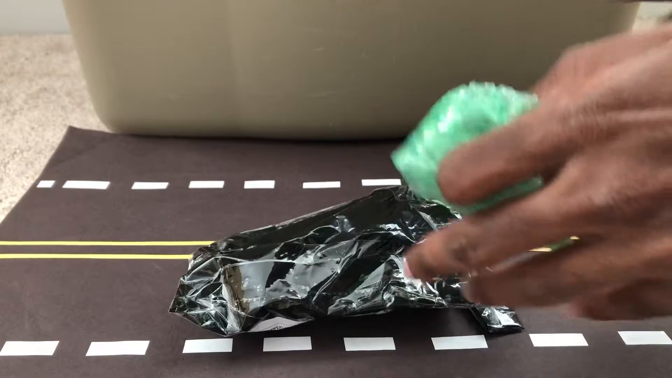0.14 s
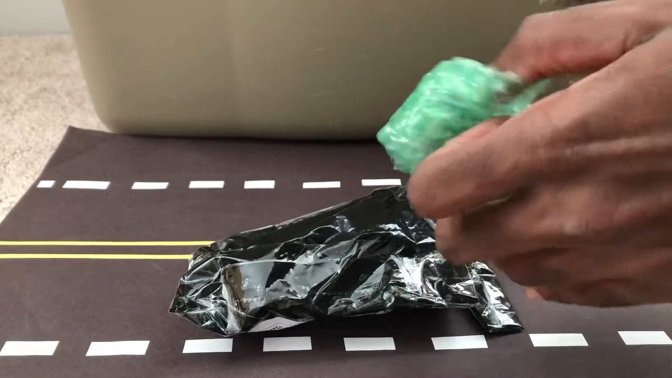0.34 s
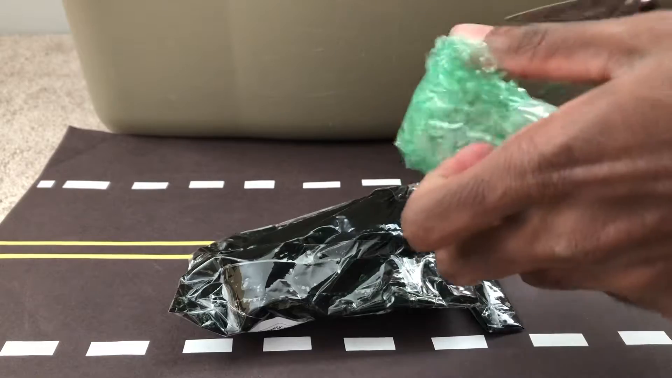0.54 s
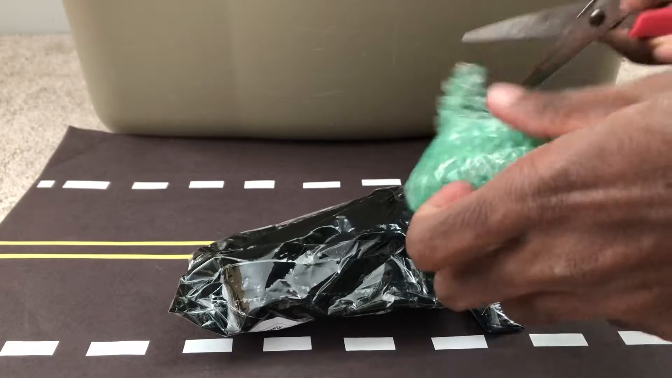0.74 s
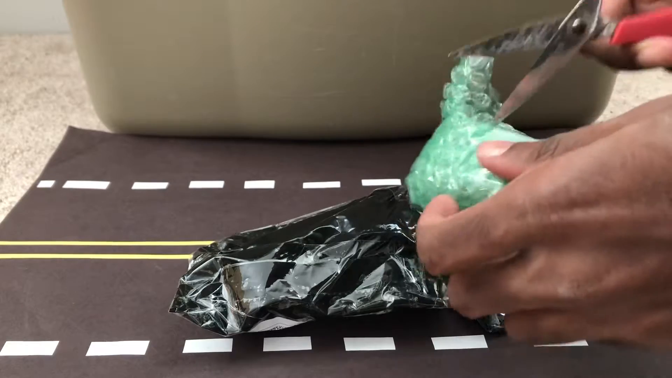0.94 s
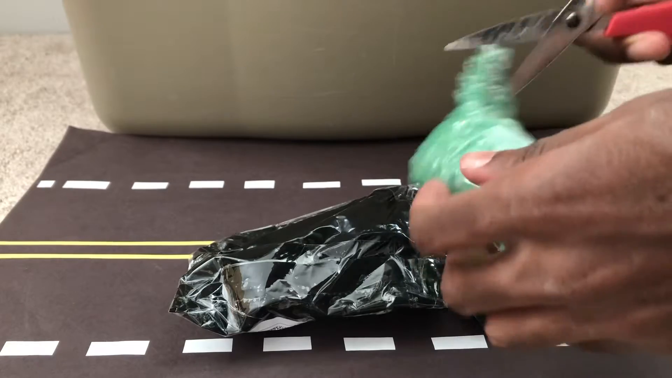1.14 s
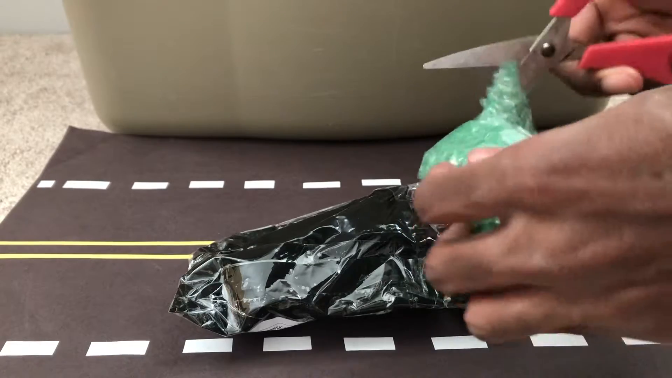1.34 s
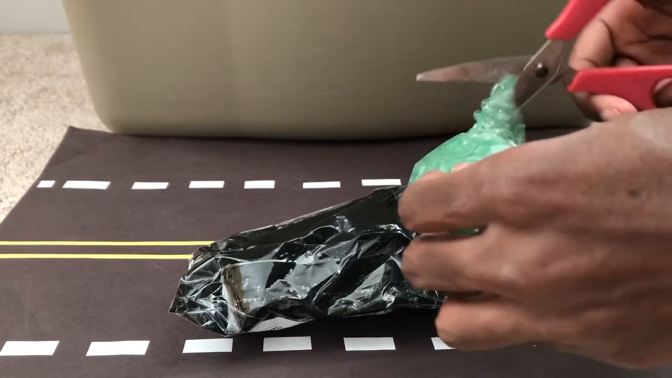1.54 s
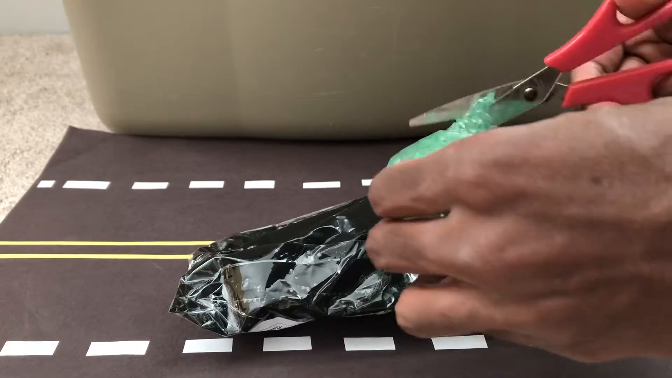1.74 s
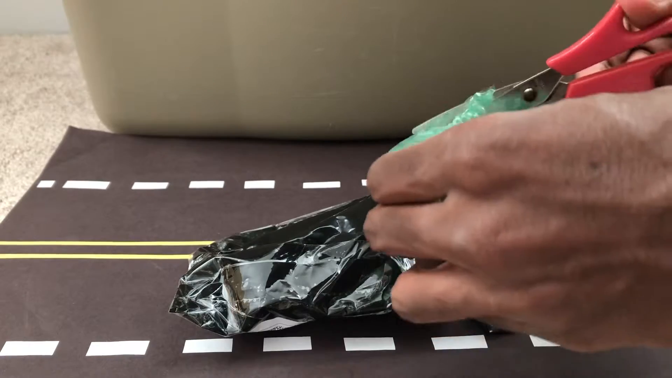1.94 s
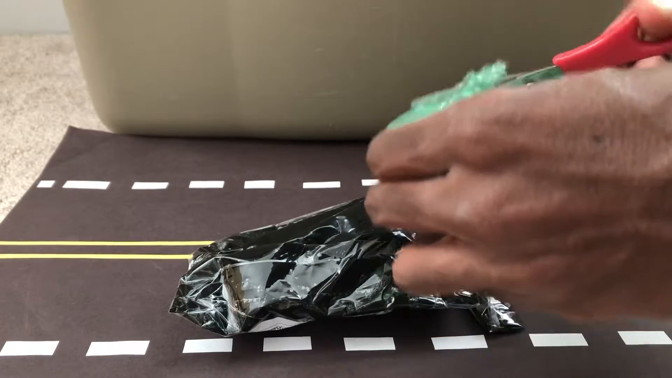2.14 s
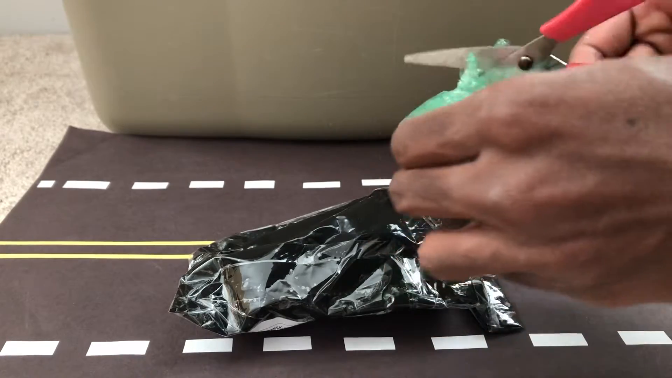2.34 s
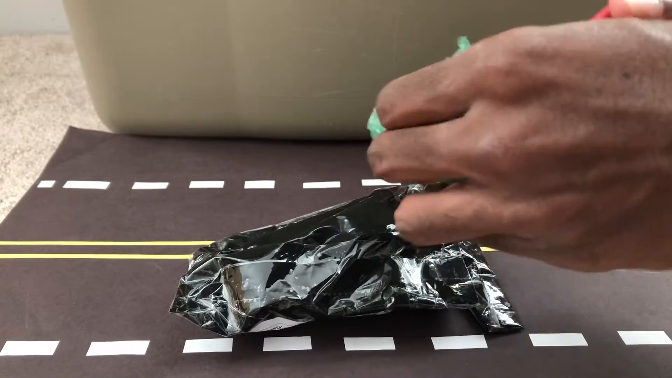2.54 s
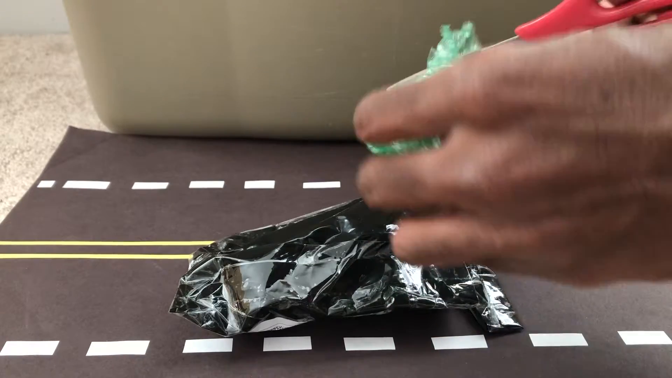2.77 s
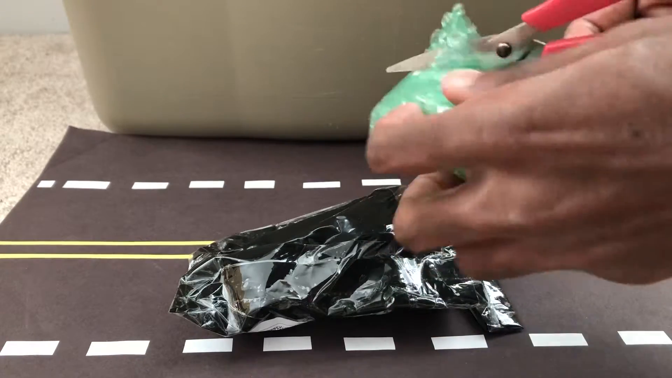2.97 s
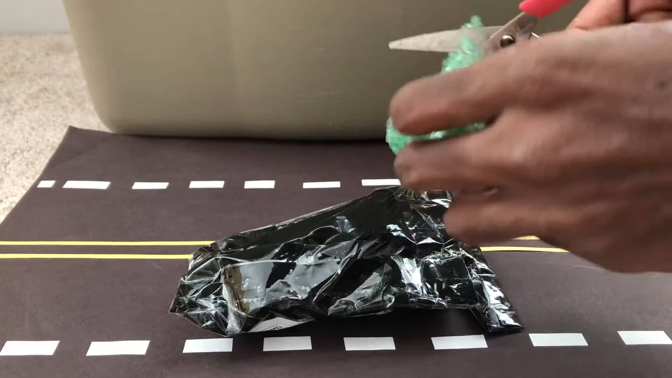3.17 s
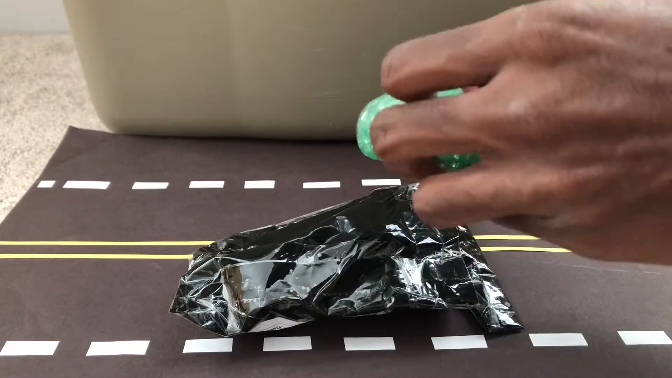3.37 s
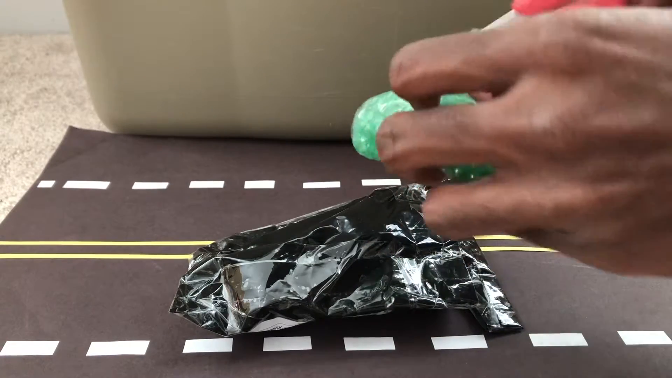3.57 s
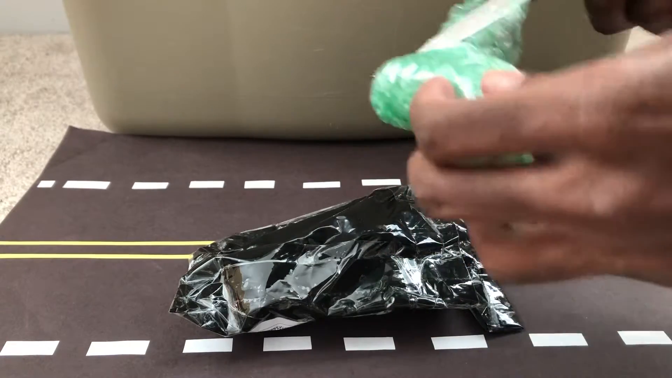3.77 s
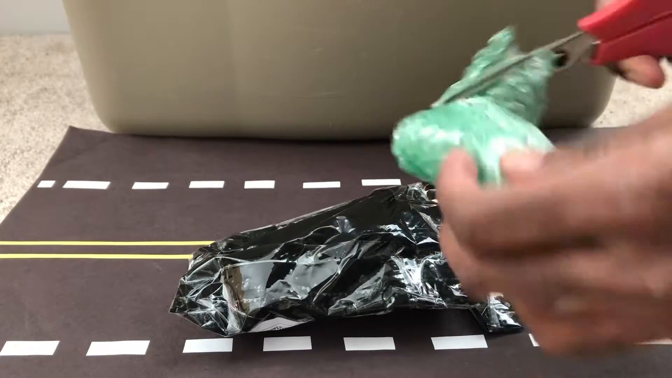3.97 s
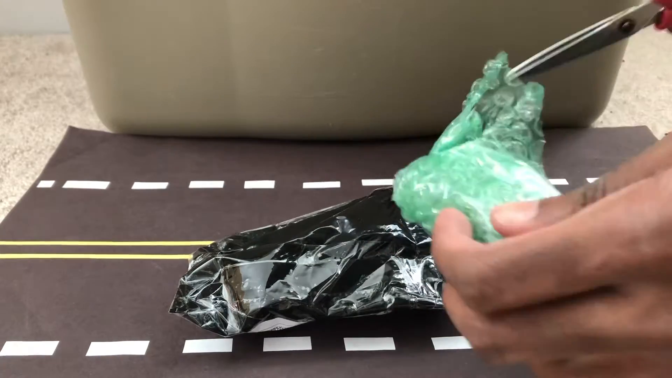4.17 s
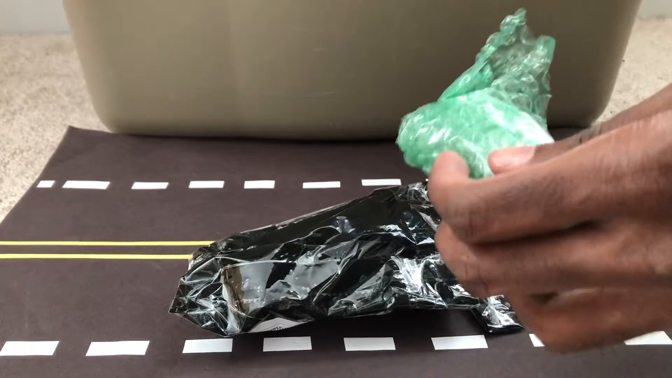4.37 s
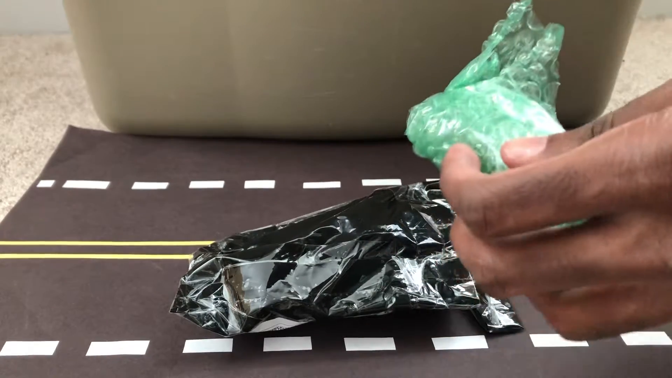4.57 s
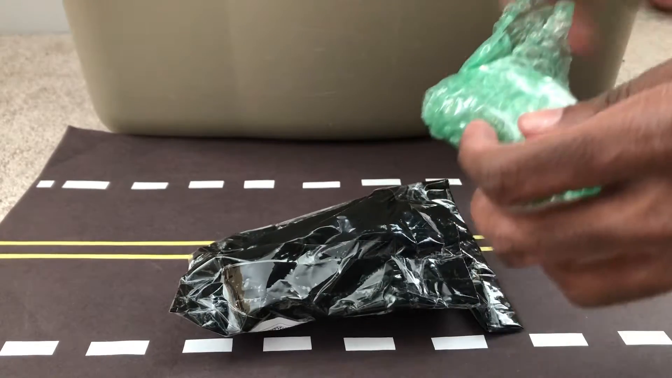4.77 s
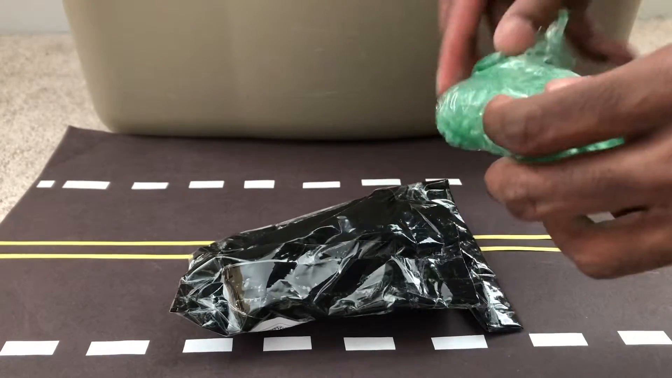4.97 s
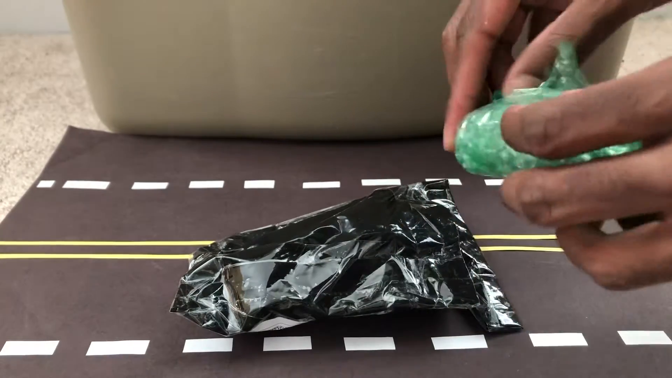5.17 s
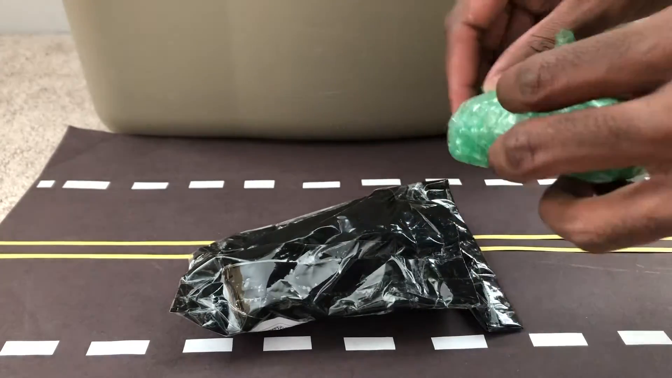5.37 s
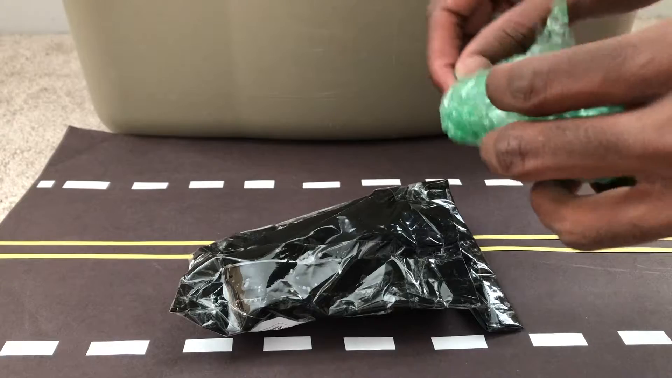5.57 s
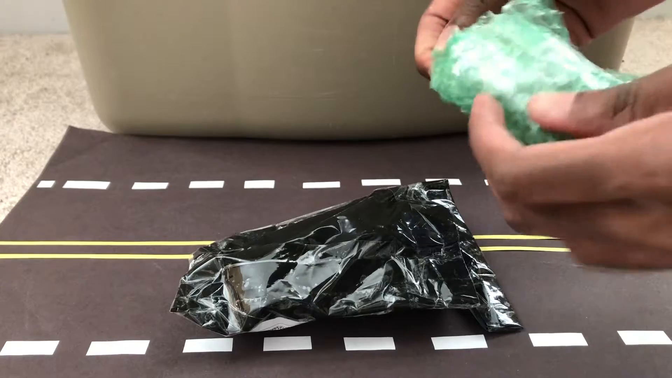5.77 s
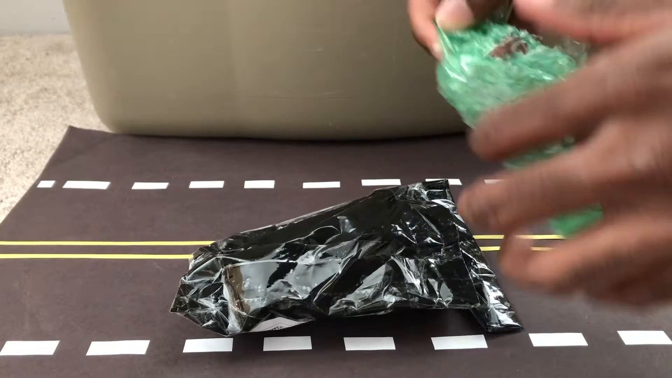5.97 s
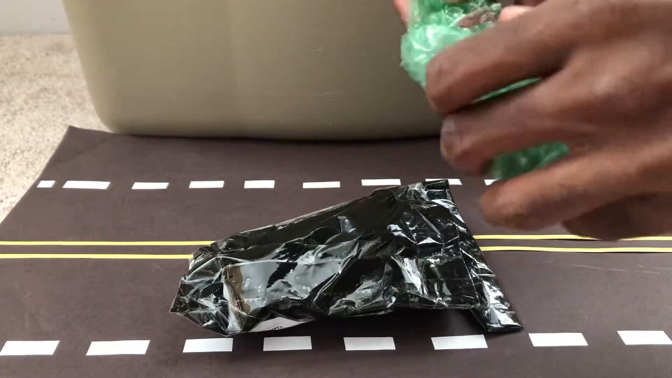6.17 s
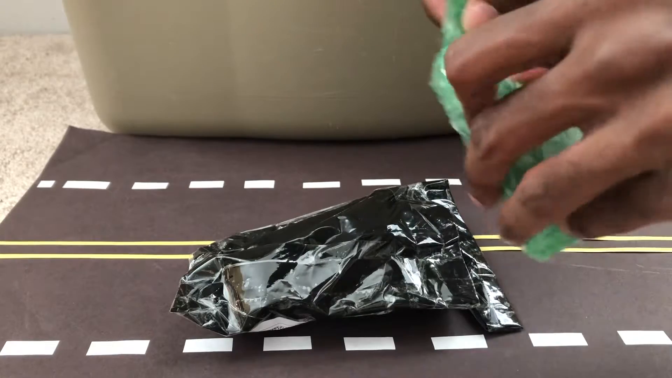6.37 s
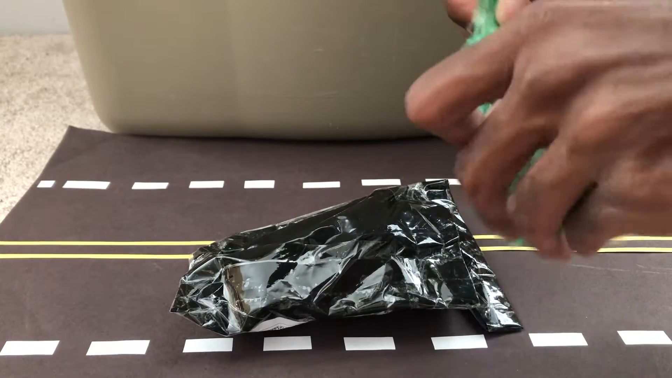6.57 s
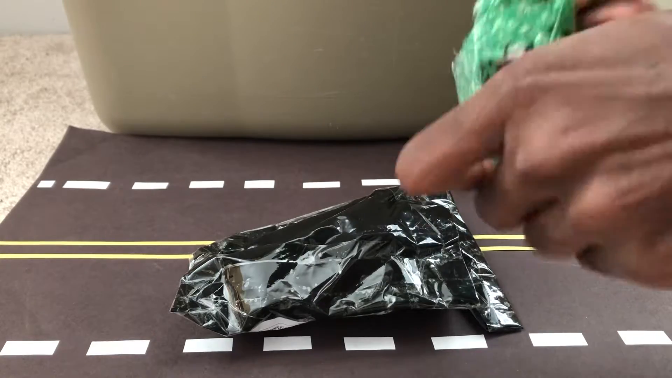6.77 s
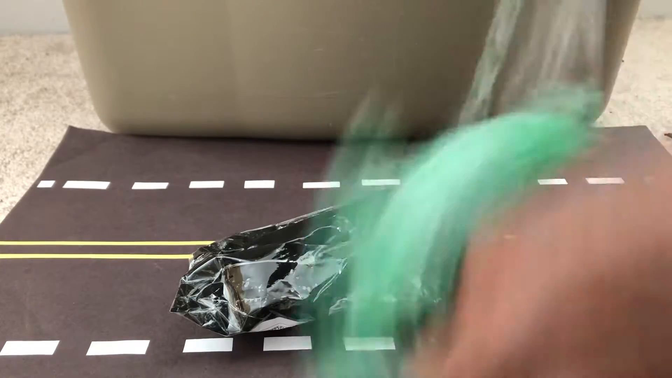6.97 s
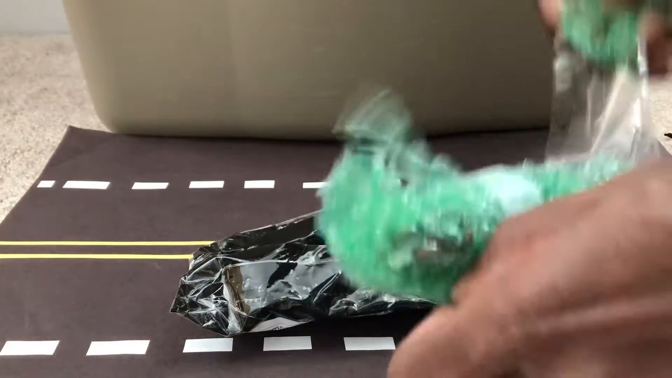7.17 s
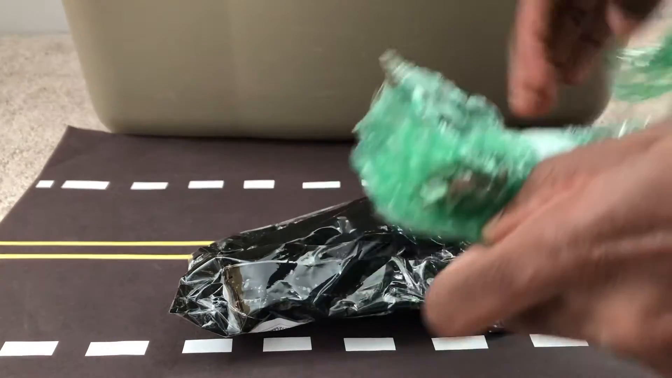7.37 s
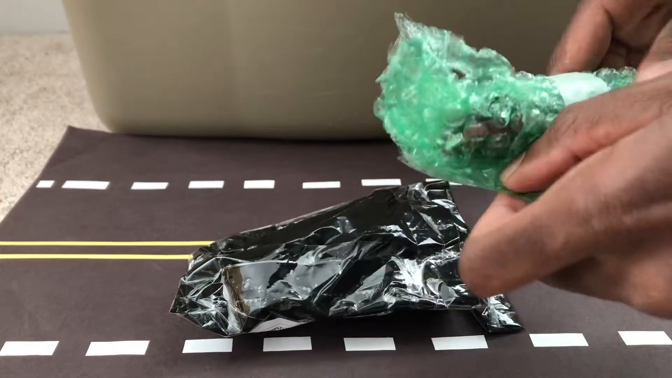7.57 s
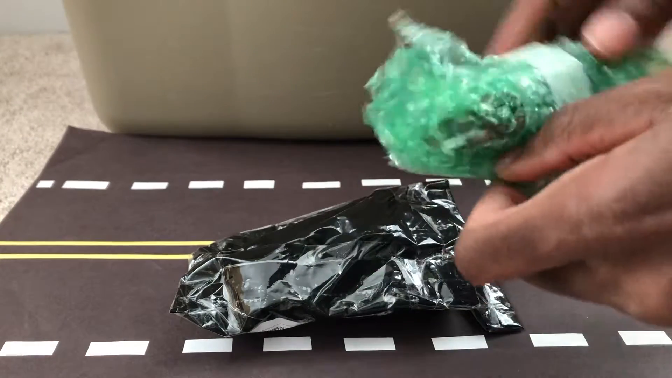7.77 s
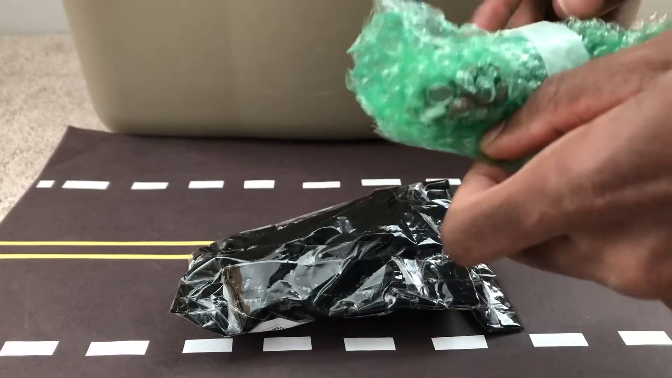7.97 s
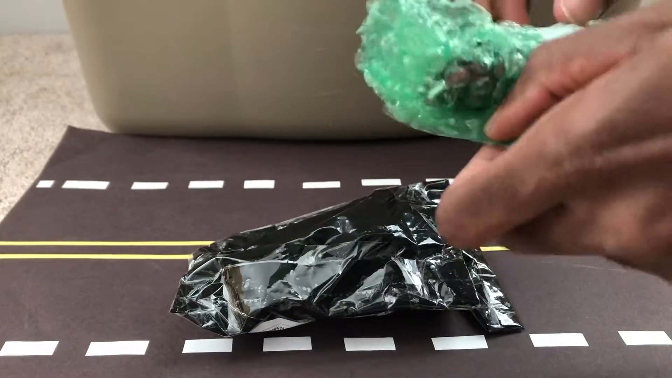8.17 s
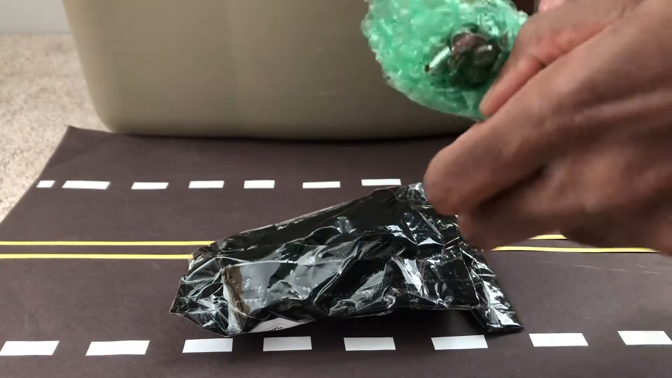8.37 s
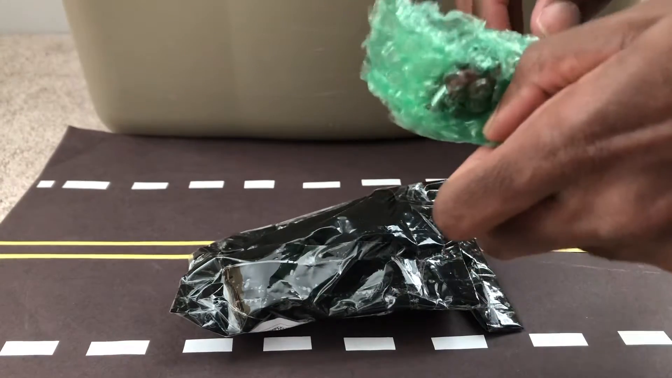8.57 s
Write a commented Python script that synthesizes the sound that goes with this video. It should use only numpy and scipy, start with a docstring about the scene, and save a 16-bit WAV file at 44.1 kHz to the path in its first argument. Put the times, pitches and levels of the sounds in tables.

```python
"""A quiet carpeted room, with hands and scissors working bubble wrap off a small object close by.
Film buckles in sharp snaps (clicks with dying noise) over fine crackle and rubbing, with a few hollow pops.
Near 2 s a taut strip squeals briefly, then the blades cut; after 4.6 s the scissors rattle, ring and thud down.
A second squeal follows; near 7 s tape rips loose among the loudest snaps and a third squeal, then it thins out.
Throughout, faint echoes of the work, band-filtered room noise and a wavering mains hum of sines lie behind."""
import sys
import numpy as np
from scipy import signal
from scipy.io import wavfile

SR = 44100
rng = np.random.default_rng(int(sys.argv[2]) if len(sys.argv) > 2 else 0)


def int16_out(signal):
    """Quantize to a 16-bit WAV file."""
    q = np.round(np.clip(np.atleast_2d(signal).T, -1, 1) * 32767)
    wavfile.write(sys.argv[1], SR, q.astype(np.int16))


N = 380141


def from_db(db):
    """Decibels to amplitude gain."""
    return 10 ** (np.asarray(db) / 20)


def rms_one(x):
    """Scales a signal to rms 1."""
    return x / np.sqrt(np.mean(x ** 2) + 1e-20)


def at_hz(points, hz):
    """Reads a spectrum in dB on a log-frequency axis."""
    point_hz, point_db = np.transpose(points)
    return np.interp(np.log(hz), np.log(point_hz), point_db)


def bands(low_hz, high_hz, count):
    """Adjoining band-passes, as pairs of centre in Hz and filter."""
    edges = np.geomspace(low_hz, min(high_hz, .45 * SR), count + 1)
    return [(np.sqrt(low * high), signal.butter(2, [low, high], "band", fs=SR, output="sos"))
            for low, high in zip(edges, edges[1:])]


def drift(rate_hz):
    """Slow chance with spread 1: low-passed noise, made at a twentieth of the sample rate."""
    pole = np.exp(-40 * np.pi * rate_hz / SR)
    noise = rng.standard_normal(N // 20 + 4002)
    slow = signal.lfilter([1], [1, -2 * pole, pole * pole], noise)[4000:]   # skips the filter's start
    return np.interp(np.arange(N) / 20, np.arange(len(slow)), rms_one(slow))


def strikes(times, sizes):
    """A click train: one sample of the given size at each time in s."""
    clicks = np.zeros(N)
    np.add.at(clicks, np.round(np.asarray(times) * SR).astype(int), sizes)
    return clicks


def dying(clicks, t60):
    """Each click starts an envelope that falls 60 dB in t60 seconds."""
    return signal.lfilter([1], [1, -from_db(-60 / (t60 * SR))], clicks + 1e-18)


def ring(clicks, hz, t60):
    """A two-pole resonance: a unit click starts a decaying sine of height 1."""
    pole, turn = from_db(-60 / (t60 * SR)), 2 * np.pi * hz / SR
    return signal.lfilter([0, np.sin(turn)], [1, -2 * pole * np.cos(turn), pole * pole], clicks + 1e-18)


def hiss(spectrum, low_hz, high_hz, patchy_db):
    """Noise shaped in bands whose levels flicker nearly together; rms 1."""
    together = drift(25)
    out = np.zeros(N)
    for hz, sos in bands(low_hz, high_hz, count=11):
        flicker_db = patchy_db * (together + 0.097 * drift(16))
        noise = signal.sosfilt(sos, rng.standard_normal(N))
        out += from_db(at_hz(spectrum, hz) + flicker_db) * noise
    return rms_one(out)


def buckles(times, band_db, click_db, crack_t60, tail_t60, tail_db):
    """A crease flips: a click and a short burst, then the film shivers; band_db(hz) colours each flip."""
    out, signs = np.zeros(N), rng.choice([-1, 1], len(times))
    for hz, sos in bands(408.0, 17030, count=9):
        signs = -signs      # neighbouring bands meet in opposite phase; flipping keeps the click whole
        sizes = from_db(band_db(hz))
        clicks = strikes(times, sizes)
        slower = (5000 / hz) ** 0.059      # larger, lower patches of film settle later
        crack = dying(clicks, crack_t60 * slower)
        tail = from_db(tail_db) * dying(clicks, tail_t60 * slower)
        sharp = from_db(click_db) * strikes(times, signs * sizes)
        flips = sharp + (crack + tail) * rng.standard_normal(N)
        out += signal.sosfilt(sos, flips) * np.sqrt(5000 / hz)
    return out


# Loud buckles of the film, close by; dull and bright parts are relative to the level, all before trims.
# Columns: [t/s, level/dB, dull part/dB, bright part/dB]
SNAPS = [(0.3169, -32.5, -22, -12), (0.3451, -33, -23, -13), (0.407, -47, -17, -2),
         (0.5295, -31.5, -15, -7), (0.6006, -31, -21, -11), (0.6155, -30.5, -26, -28),
         (0.7983, -35, -13, -19), (0.8293, -37, -5, -21), (0.9001, -40, -2, -17), (0.9047, -38, -5, -16),
         (1.0929, -30, -15, -5), (1.2341, -37, -10, -7), (1.3718, -37, -12, -3), (1.4052, -4.5, -41, -8.5),
         (1.4568, -22.5, -14, -3), (1.5402, -35, -18, -18), (1.5678, -30.5, -18, -10), (1.59, -41, -24, 0),
         (1.6096, -38, -20, 3), (1.6412, -52, -21, -18), (1.7609, -25, -16.5, -16), (1.8491, -43, -35, -8),
         (1.9336, -35.5, -17, -2), (1.9829, -37, -10, -15), (2.2652, -46, -12, -9), (2.3895, -40, -10, -5),
         (2.4134, -30.5, -29, -2.5), (2.5152, -40.5, -16, -2), (2.5388, -34, -17, -6.5),
         (2.5826, -43.5, -12, 4.5), (2.5997, -45, -3, -2), (2.7077, -40.5, -13, -6), (2.7241, -36, -13, 0),
         (2.769, -33, -32, -5), (2.8421, -43, 0, 6), (2.8546, -38, -27, 1), (2.8761, -38, -33, -3),
         (2.901, -30.5, -25, -3), (2.9046, -32.5, -30, 0), (2.9592, -23.5, -28, 7.5), (3.0119, -28, -32, 0),
         (3.0309, -39, -28, -9), (3.0405, -24, -33, -11), (3.0544, -31, -18, -18), (3.065, -18, -22, -8.5),
         (3.0988, -32, -24, -6), (3.1447, -32.5, -20, -6), (3.1688, -34, -14.5, -5),
         (3.1847, -28.5, -23, -5), (3.2784, -32, -27, 2), (3.2835, -27.5, -33, -4.5),
         (3.3255, -30.5, -33, -7), (3.3832, -34.5, -27, -2), (3.4131, -47, -17, 5), (3.4292, -38.5, -16, 2),
         (3.4672, -39, -12, 5), (3.4823, -38, -23, 2), (3.4955, -36, -31, 3), (3.5289, -45, -15, 3),
         (3.5993, -36, -14, -4), (3.6161, -31.5, -1.5, -7), (3.6342, -39, -20, 6),
         (3.6677, -17, -18.5, -21), (3.6953, -33, -23, 0), (3.7374, -29, -19, -8), (3.7518, -20.5, -48, 3),
         (3.7644, -31, -34, -5), (3.7732, -24, -35, -5), (3.7951, -10.5, -30, -13), (3.8164, -39, -24, -4),
         (3.8517, -33, -32, -13), (3.8671, -31, -24, 2.5), (3.8896, -27, -19, -8), (3.9225, -39, -17, -2),
         (3.9607, -32, -28, -11), (3.9727, -29.5, -36, -3), (4.0816, -28.5, -30, -8.5),
         (4.116, -25, -34, -14), (4.138, -40, -25, -7), (4.1492, -17, -53, -8), (4.1924, -29.5, -38, -2),
         (4.1967, -29.5, -3, 3), (4.2291, -23.5, 0, -4.5), (4.42, -35.5, -25, -7), (4.4543, -37, -11, -26),
         (4.577, -38, -26, -4.5), (4.6699, -32, -14, -6), (4.6945, -35, -28, -13), (5.2036, -32, -21, -6),
         (5.3487, -29, -18, -17), (5.3839, -30, -19, -17), (5.4081, -14, -29, -12), (5.436, -34, -26, 0),
         (5.5249, -41, -19, -7), (5.5378, -34, -10.5, -8), (5.566, -38.5, -6, 0), (5.6166, -29, -32, -18),
         (5.669, -27.5, -23, -4), (5.6927, -30.5, -24, 4), (5.7044, -32, -22, 6), (5.7359, -12.5, -21, -14),
         (5.7405, -11.5, -14, -2.5), (5.7471, -16.5, -14, -7), (5.7563, -16.5, -23, -2),
         (5.8025, -31, -21, 0), (5.8121, -29, -22, -2), (5.8248, -26, -17, -8), (5.8471, -20.5, -26, -15),
         (5.9568, -25, -12, -1), (6.0155, -21, -14.5, -18), (6.0706, -45, -15, -6), (6.103, -30.5, -22, -4),
         (6.1439, -33.5, -19, 0.5), (6.2023, -31, -36, 4), (6.2538, -23, -30, -9), (6.2816, -21, -38, -13),
         (6.2976, -31, -36, 1), (6.3126, -23, -26, -9), (6.335, -28, -8, -5), (6.3719, -26.5, -16, 1.5),
         (6.3947, -29, -30, 0.5), (6.4992, -19.5, -19, 5), (6.5134, -23.5, -11.5, -13),
         (6.5341, -32, -10, 1), (6.5518, -17, -8, -8.5), (6.573, -34, -16, 6), (6.594, -9.5, -17.5, -10),
         (6.6218, -28, -19, -1), (6.6289, -27, -20, 0), (6.6617, -8.5, -28, -16), (6.695, -28, -29, 2.5),
         (6.72, -19.5, -17, -6), (6.7409, -25, -24, 0), (6.7549, -22, -27, -3), (6.7719, -13.5, -8.5, -1),
         (6.7767, -19, -25, 5), (6.8133, -16, -20, 0), (6.8388, -16.5, -17, 1), (6.8423, -19, -23, -6),
         (6.8759, -23.5, -2.5, 4), (6.8793, -16, -3.5, 4), (6.9002, -9, -46, -8), (6.9152, -7.5, -34, -2.5),
         (6.9358, -18, -23, 4), (6.9658, -1, -10.5, -2.5), (6.9784, -16, -19, -15), (6.9879, -7, -2.5, -8),
         (6.9966, 4, -17, -16), (7.0164, -3, -6, 4), (7.022, -8, -6.5, -9), (7.0277, -5, -8, -7),
         (7.0431, -13, 2.5, 4), (7.0547, -15, -17, -2), (7.0611, -15, 9.5, -4), (7.084, -14, -22, -5),
         (7.0985, -2, -13, -9), (7.1121, -7, -1, -18), (7.121, -16, -20, -10), (7.1608, -21, -7, -12),
         (7.1751, -15, -20, -4), (7.2406, -25, -7, -7), (7.2579, -25.5, -9.5, -6), (7.2954, -29.5, -28, 2),
         (7.3222, -14, -15, -8), (7.3475, -42, -30, 9), (7.3981, -21, -42, -10), (7.4774, -33, -29, -9),
         (7.4829, -33, -9, -8), (7.5173, -39, -17, -10), (7.5698, -33.5, -30, -7), (7.5797, -40, -17, -4),
         (7.6167, -35, -20, -15), (7.704, -35, 6, -11), (7.8157, -19.5, -11.5, -41),
         (7.8535, -31.5, -7, -17), (7.89, -34.5, -3, -1), (7.9051, -31.5, 3, 2), (8.0573, -41, -10, 4),
         (8.1199, -38, 1.5, 4), (8.2542, -29.5, -11, -6), (8.2727, -23.5, -48, -7),
         (8.3367, -27.5, -13, -9), (8.3481, -25.5, -16, -8), (8.3649, -29, -17, -4),
         (8.3768, -27, -10, -12), (8.3948, -20, -29, -9.5), (8.4402, -35, -19, 7), (8.4737, -30, -29, -21)]


def snaps(rows):
    """Buckles made dull or bright by the size of the crease; bass and topmost treble fall away."""
    s, level_db, dull_db, bright_db = np.transpose(rows)

    def band_db(hz):
        octaves = np.log2(hz / 4500)
        dull, bright = np.clip(-octaves / 1.81, 0, 1), np.clip(octaves / 0.77, 0, 1)
        edge_db = 8.9 * min(np.log2(hz / 1300), 0) - 2.0 * max(np.log2(hz / 10500), 0)
        colour_db = dull * (dull_db + 2.5) + bright * (bright_db + 6.5)
        return level_db + 2.0 + edge_db + colour_db + rng.normal(0, 1.4, len(s))
    return buckles(s, band_db, click_db=8.5, crack_t60=0.0067, tail_t60=0.029, tail_db=-16.5)


# The blades bite through in quick slips; parts are relative to the level, which fades and varies.
# One row: [from t/s, to t/s, gap/s, level/dB, dull part/dB, bright part/dB]
CUT = (2.301, 2.374, .0063, -30, -11, -8)
CUT_FADE_DB_PER_S = 70


def cut():
    """Uneven stick and slip of the closing blades, as rows for snaps()."""
    start, end, gap_s, level_db, dull_db, bright_db = CUT
    s = np.arange(start, end, gap_s)
    late, size = rng.normal(0, 1, (2, len(s)))
    levels_db = level_db - CUT_FADE_DB_PER_S * (s - start) + 3 * size
    dull, bright = np.full(len(s), dull_db), np.full(len(s), bright_db)
    return np.transpose([s + .1 * gap_s * late, levels_db, dull, bright])


# Lesser buckles come at random, this far above the crackle
LESSER_PER_S, LESSER_OVER_DB, LESSER_SPREAD_DB = 70, 5, 3.0
LESSER_DULL_DB, LESSER_BRIGHT_DB, COLOUR_SPREAD_DB = -16.5, -7.5, 7


def lesser_snaps(crackle_db):
    """Rows for snaps(), drawn at random and sized by the crackle level around them."""
    born = np.flatnonzero(rng.random(N) < LESSER_PER_S / SR)
    size = rng.exponential(1, len(born))
    dull, bright = rng.normal(0, COLOUR_SPREAD_DB, (2, len(born)))
    level_db = crackle_db[born] + LESSER_OVER_DB + LESSER_SPREAD_DB * np.minimum(size, 2)
    return np.transpose([born / SR, level_db, LESSER_DULL_DB + dull, LESSER_BRIGHT_DB + bright])


EDGE_BEND = 1.1   # a move starts and stops ever faster towards its ends


def swell(s, level_db, rise_s, hold_s, fall_s):
    """Power of one move: rises until s, holds, falls; rise and fall times each span 10 dB."""
    t = np.arange(N) / SR - s
    away = np.maximum(-t / max(rise_s, .002), (t - max(hold_s, 0)) / max(fall_s, .002))
    return from_db(2 * level_db - 20 * np.clip(away, 0, 8) ** EDGE_BEND)


# Moves of the hands and blades on the wrap; rubbing is relative to the crackle.
# Columns: [t/s, crackle level/dB, rise/s, hold/s, fall/s, rubbing level/dB]
MOVES = [(0.088, -74, 0.53, .08, .05, 5.5), (0.216, -56, 0.013, .001, 0.017, 8),
         (0.357, -51.5, 0.14, .001, 0.019, -17), (0.422, -53.5, .026, .18, 0.1, -4.5),
         (0.803, -53.5, 0.32, .001, 0.05, -1), (1.003, -56, 0.11, .001, 0.018, -11),
         (1.093, -51, 0.027, 0.02, 0.0086, -1), (1.278, -47, 0.0091, 0.023, 0.018, -1.5),
         (1.414, -45, 0.038, .001, 0.16, -17), (1.697, -50.5, 0.037, .001, 0.031, -11),
         (1.815, -50.5, 0.058, .001, 0.044, -25), (2.009, -54.5, 0.12, 0.003, 0.052, -9),
         (2.275, -58.5, .2, 0.00091, 0.76, -12), (2.28, -55, 0.026, 0.058, 0.038, -12),
         (2.536, -63, 0.087, 0.083, .04, -4), (2.625, -65, 0.025, .04, 0.024, 9),
         (2.716, -49.5, 0.0072, 0.014, .02, -2), (2.759, -52.5, 0.024, 0.0088, 0.025, -22),
         (2.995, -45, 0.12, .001, 0.096, -18), (3.208, -49, 0.06, .001, 0.13, -14),
         (3.458, -52, 0.052, .001, 0.045, -3), (3.65, -53.5, 0.084, 0.086, 0.11, -19),
         (3.767, -45, 0.056, 0.0017, 0.078, -28), (3.877, -60, .1, 0.028, 0.12, -10),
         (4.151, -49.5, 0.17, .05, 0.034, -14), (4.223, -41, 0.075, 0.032, 0.026, -5),
         (4.348, -65.5, .05, 0.21, 0.046, -15), (4.733, -63.5, .05, .001, 0.024, 2),
         (4.8, -54, 0.0021, 0.0092, .025, -9), (4.854, -67.5, .03, 0.12, .05, 4),
         (4.998, -52.5, 0.0084, .01, 0.2, -5.5), (5.128, -42.5, 0.02, .001, 0.028, -8),
         (5.212, -50.5, 0.025, .001, 0.071, -5), (5.311, -43, 0.023, 0.018, 0.035, -7.5),
         (5.403, -52, 0.039, 0.037, 0.051, -9.5), (5.585, -47.5, 0.048, 0.22, 0.042, -17),
         (5.738, -31.5, 0.01, .001, 0.049, -25), (5.847, -46, 0.079, 0.14, 0.076, -19.5),
         (6.132, -60.5, .02, 0.017, 0.035, -4), (6.179, -46, 0.006, 0.12, .05, -12),
         (6.345, -48, 0.035, 0.053, 0.082, -12), (6.595, -39, 0.13, .001, 0.058, -17),
         (6.767, -30.5, 0.031, .001, 0.23, -38), (7.205, -42, .03, 0.064, 0.025, -0.5),
         (7.325, -35.5, 0.044, .001, 0.025, -25), (7.398, -42, 0.096, 0.002, 0.023, -11),
         (7.483, -51, 0.045, .001, 0.028, -8), (7.598, -48, .012, .04, 0.13, -3.5),
         (7.681, -39.5, 0.025, .001, 0.022, -2), (7.79, -52, 0.1, 0.06, .05, -2),
         (7.895, -39.5, .04, .001, 0.034, -7), (7.956, -47.5, 0.021, 0.063, 0.023, 0),
         (8.059, -50.5, 0.011, .001, 0.034, -4), (8.11, -51.5, 0.018, .03, 0.55, -1.5),
         (8.371, -39.5, 0.024, .001, 0.029, -9), (8.437, -44, 0.016, 0.03, 0.023, -5.5),
         (8.545, -45, 0.0047, .001, 0.062, -9)]
# Tape tears loose: points of a level curve. Columns: [t/s, crackle level/dB, rubbing level/dB]
RIP = [(6.952, -39, -78), (6.965, -23, -41), (7.05, -18, -25.5), (7.119, -13, -19), (7.13, -25, -32),
       (7.19, -35.5, -49), (7.25, -82, -80)]
# The whole bundle shifts in the hand. Columns: [t/s, level/dB, rise/s, fall/s]
SHIFTS = [(0.349, -70, .1, .07), (0.75, -64, 0.12, 0.088), (1.109, -54.5, 0.026, 0.018),
          (1.284, -46, 0.0099, 0.013), (1.417, -59, .03, 0.072), (3.008, -65, 0.058, 0.064),
          (3.632, -65, 0.034, .05), (3.841, -64, .08, 0.084), (4.265, -48.5, 0.062, .018),
          (4.82, -59, .015, 0.032), (5.326, -62, 0.043, 0.095), (5.746, -48.5, 0.013, .022),
          (5.9, -67.5, 0.12, 0.18), (6.2, -59.5, 0.058, .3), (6.59, -60, 0.16, 0.079),
          (6.77, -55, 0.025, 0.13), (7.07, -31.5, 0.039, 0.076), (7.118, -25, 0.022, 0.0098),
          (7.19, -45.5, 0.12, 0.092), (7.328, -35, 0.0073, 0.0062), (7.403, -49, 0.027, 0.01),
          (7.687, -53, 0.016, .02), (7.897, -47.5, .02, 0.02), (7.997, -65, 0.077, 0.056),
          (8.33, -66.5, 0.22, .1), (8.552, -64, 0.058, 0.06)]
REST_CRACKLE_DB, REST_RUB_DB, REST_SHOVE_DB = -74.5, -90, -74   # the held wrap is never quite still


def handling():
    """Level curves of crackle, rubbing and shove in dB: the moves add up as powers."""
    s, *rip_db = np.transpose(RIP)
    t = np.arange(N) / SR
    crackle_power, rub_power = [from_db(2 * np.interp(t, s, db, -99, -99)) for db in rip_db]
    for *move, rub_db in MOVES:
        power = swell(*move)
        crackle_power += power
        rub_power += power * from_db(2 * rub_db)
    shove_power = sum(swell(at, db, rise_s, 0, fall_s) for at, db, rise_s, fall_s in SHIFTS)
    powers = crackle_power, rub_power, shove_power
    rests = REST_CRACKLE_DB, REST_RUB_DB, REST_SHOVE_DB
    return [10 * np.log10(power + from_db(2 * db)) for power, db in zip(powers, rests)]


# Spectrum of the film's crackle and hiss. Columns: [f/Hz, relative level/dB per Hz]
FILM = [(290, -46), (500, -16.5), (3980, -1.5), (4340, 4.5), (4800, 1), (5880, 2), (8090, -1.5), (11300, 1),
        (16000, -5)]


def crackle(level_db):
    """Many small creases flip at random, in quick clumps, over the hiss of film sliding on film."""
    clumps = drift(45)
    born = np.flatnonzero(rng.random(N) < 500 * from_db(3.0 * clumps) / SR)
    size_db = 1.5 * np.minimum(rng.exponential(1, len(born)), 3.5)

    def band_db(hz):
        film_db = at_hz(FILM, hz) + 10 * np.log10(hz / 5000)
        return size_db + film_db + rng.normal(0, 5.1, len(born))
    grains = rms_one(buckles(born / SR, band_db, click_db=13.5, crack_t60=0.0081, tail_t60=0.03, tail_db=-20))
    sliding = from_db(-6.5) * hiss(FILM, 604, 16000, patchy_db=1.0)
    return from_db(level_db + 0.5) * (grains + sliding)


# Spectrum of the rubbing. Columns: [f/Hz, relative level/dB per Hz]
BUNDLE = [(400, -5.5), (650, 2.5), (1200, 2), (1700, 3.5), (2000, 4.5), (2600, -11.5), (4000, 10.5)]


def rubbing(level_db):
    """Hands rub the bundle: patchy noise in the middle range, following the moves."""
    return from_db(level_db - 3.5) * hiss(BUNDLE, 400, 4000, patchy_db=3.5)


# Spectrum of the bundle's low shove. Columns: [f/Hz, relative level/dB per Hz]
SHOVE = [(100, -55), (160, -4), (300, 1.5), (550, -3.5), (800, -14)]


def shoves(level_db):
    """The whole bundle shifts in the hand: low noise that swells and falls."""
    return from_db(level_db - 0.5) * hiss(SHOVE, 101.3, 743, patchy_db=1.5)


# Taut film or tape sings as it peels. Columns: [from t/s, to t/s, f/Hz, level/dB]
SQUEAL = [(1.943, 2.027, 1700, -60.5), (5.19, 5.23, 1300, -58), (7.026, 7.076, 1880, -24.5)]


def squeal():
    """A stretched strip is a resonance shaken by the letting go of what holds it."""
    out = np.zeros(N)
    for start, end, hz, level_db in SQUEAL:
        pull = np.interp(np.arange(N) / SR, [start - .01, start, end, end + 0.024], [0, 1, 1, 0])
        out += from_db(level_db) * pull * rms_one(ring(rng.standard_normal(N), hz, 0.022))
    return out


# Air cells thump hollow; level before trim and low-pass. Columns: [t/s, peak level/dB, f/Hz]
POPS = [(0.194, -44, 750), (0.528, -33, 1550), (0.732, -52, 574), (1.406, -30.5, 950), (1.476, -36.5, 1070),
        (2.725, -47.5, 760), (3.943, -43.5, 900), (5.123, -35, 915), (5.307, -39.5, 970), (7.681, -43, 666)]


def pops():
    """A pressed air cell rings for a few cycles, softened by a low-pass."""
    rung = sum(ring(strikes([s], [from_db(peak_db + 3.5)]), hz, 14 / hz) for s, peak_db, hz in POPS)
    return signal.sosfilt(signal.butter(2, 1800, fs=SR, output="sos"), rung)


# Scissors touch the table; level before trims. Columns: [t/s, peak level/dB]
SET_DOWN = [(4.63, -24), (4.668, -44), (4.801, -39.5), (4.812, -42.5)]
# Ringing modes of the blades. Columns: [f/Hz, relative level/dB, t60/s]
SCISSORS = [(3280, -1, 0.046), (5400, -5, 0.026)]
# Spectrum of the rattle. Columns: [f/Hz, relative level/dB per Hz]
CLATTER = [(150, 6), (400, -7.5), (900, -2.5), (2500, -8), (6000, -6), (12000, -20)]


def scissors():
    """Each touch gives a dying rattle of noise and strikes every blade mode with a chance strength."""
    s, peak_db = np.transpose(SET_DOWN)
    rattle = dying(strikes(s, from_db(peak_db - 4.5)), 0.074) * hiss(CLATTER, 137, 14200, patchy_db=0.0)
    blades = np.zeros(N)
    for hz, mode_db, t60 in SCISSORS:
        strength_db = peak_db - 14 + mode_db + rng.normal(0, 5.0, len(s))
        blades += ring(strikes(s, from_db(strength_db)), hz, t60)
    return blades + rattle


# Handles land on the padded top; level before trim. Columns: [t/s, peak level/dB, first f/Hz]
THUDS = [(4.7324, -27.5, 332), (4.764, -34, 201), (4.795, -32, 192)]
# Answer of the table top. One row: [settled f/Hz, pitch fall/s, t60/s]
TABLE = (104, 0.0078, 0.1)


def thuds():
    """The top bends: quick waves arrive first, so the pitch falls to its settled note."""
    out, (settled_hz, fall_s, t60) = np.zeros(N), TABLE
    t = np.arange(int(.2 * SR)) / SR
    for s, peak_db, first_hz in THUDS:
        turns = settled_hz * t + (first_hz - settled_hz) * fall_s * (1 - np.exp(-t / fall_s))
        envelope = (1 - np.exp(-t / 0.0057)) * from_db(peak_db + 1.0 - 60 * t / t60)
        out[round(s * SR):][:len(t)] += envelope * np.sin(2 * np.pi * turns)
    return out


ROOM_T60_S = 0.3


def room(x):
    """Diffuse echoes: decaying noise after a 6 ms gap, duller than the source."""
    t = np.arange(int(.5 * SR)) / SR
    echoes = rng.standard_normal(len(t)) * from_db(-60 * t / ROOM_T60_S) * (t > .006)
    echoes = signal.lfilter([.4], [1, -.6], echoes)
    return signal.fftconvolve(x, echoes / np.linalg.norm(echoes))[:N]


# Spectrum of the quiet room. Columns: [f/Hz, relative level/dB per Hz]
ROOM_TONE = [(35, -43), (60, 7), (90, -3.5), (130, -7), (250, -14.5), (550, -26.5), (2000, -24.5),
             (5000, -52), (16000, -52)]
ROOM_TONE_DB = -61.5


def room_tone():
    """The soft noise of the room: mostly low bands of noise with a very slight flicker."""
    return from_db(ROOM_TONE_DB) * hiss(ROOM_TONE, 31.2, 19200, patchy_db=-0.3)


# Mains lines, level about which each wavers. Columns: [f/Hz, rms level/dB]
HUM = [(59.3, -56.5), (118.6, -76), (237.2, -76.5)]


def hum():
    """Mains lines: sines that each waver a little in level."""
    t = np.arange(N) / SR
    out = np.zeros(N)
    for hz, level_db in HUM:
        height = np.sqrt(2) * from_db(level_db + 1.9 * drift(9))
        out += height * np.sin(2 * np.pi * (hz * t + rng.random()))
    return out


def scene():
    """Wrap and scissors close by, their echoes far below, over room tone and hum."""
    crackle_db, rub_db, shove_db = handling()
    buckling = snaps(np.vstack([SNAPS, cut(), lesser_snaps(crackle_db)]))
    wrap = buckling + crackle(crackle_db) + rubbing(rub_db) + shoves(shove_db) + squeal() + pops()
    near = wrap + scissors() + thuds()
    return (near + from_db(-24.5) * room(near) + room_tone() + hum())[None]


CUTOFF_HZ = 16600   # from here up the low-pass stops at least 75 dB


def record(dry):
    """The microphone's side: deepest bass is rolled off, peaks are rounded, the top is cut."""
    dry = signal.sosfilt(signal.butter(4, 46, "high", fs=SR, output="sos"), dry)
    rounded = 0.98 * np.tanh(dry / 1.277)
    return signal.sosfilt(signal.cheby2(20, 75, CUTOFF_HZ, fs=SR, output="sos"), rounded)


dry = scene()
out = record(dry)
int16_out(out)
```